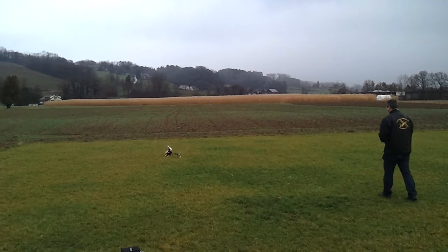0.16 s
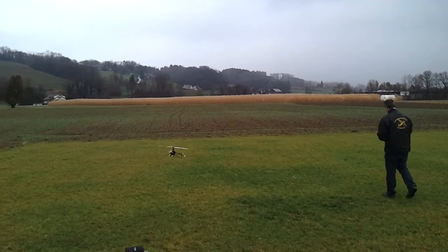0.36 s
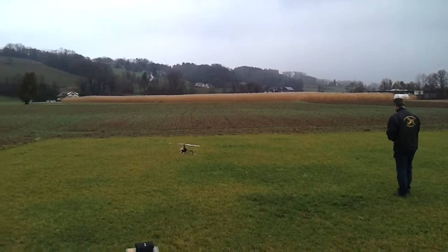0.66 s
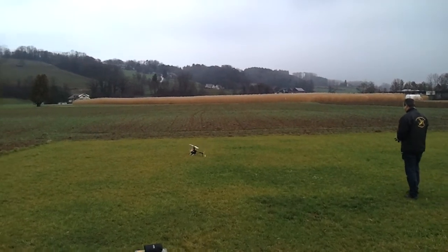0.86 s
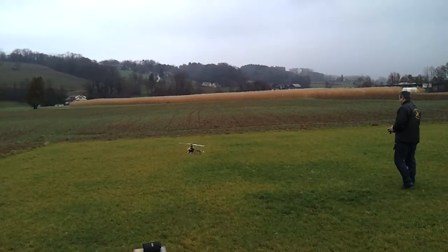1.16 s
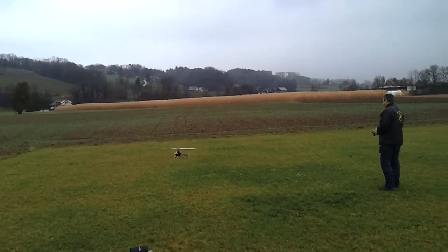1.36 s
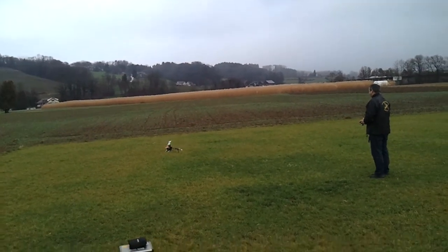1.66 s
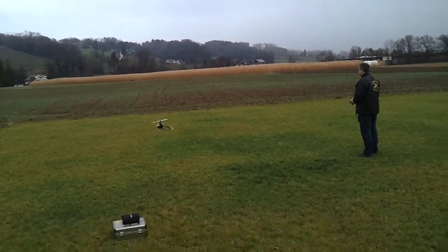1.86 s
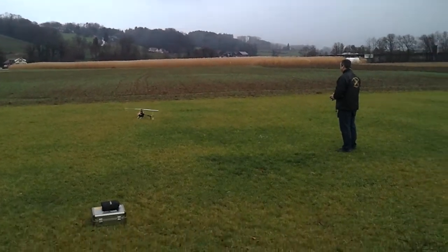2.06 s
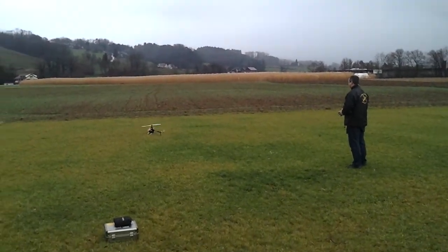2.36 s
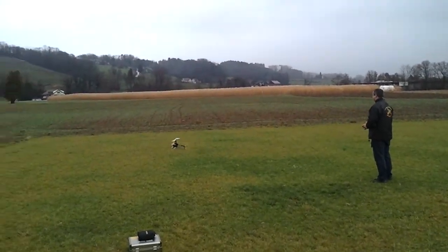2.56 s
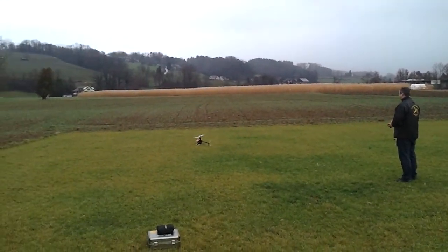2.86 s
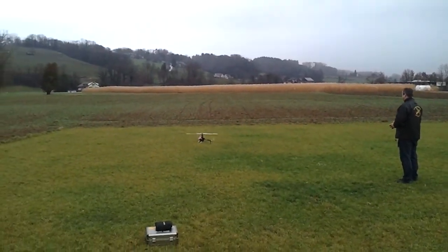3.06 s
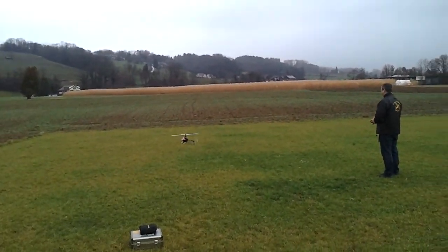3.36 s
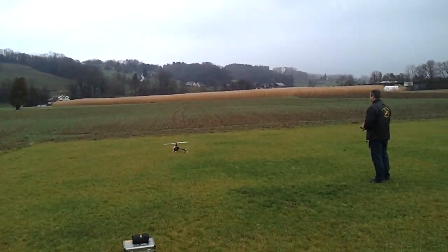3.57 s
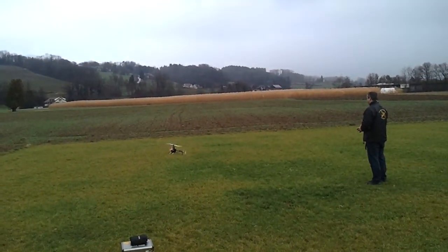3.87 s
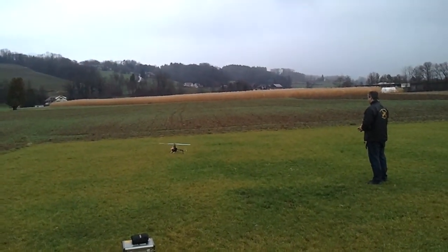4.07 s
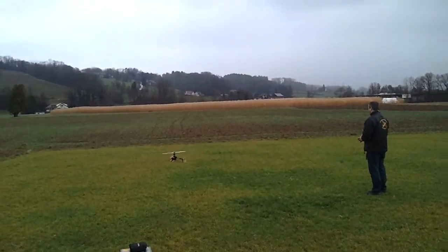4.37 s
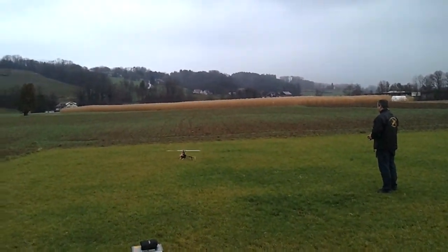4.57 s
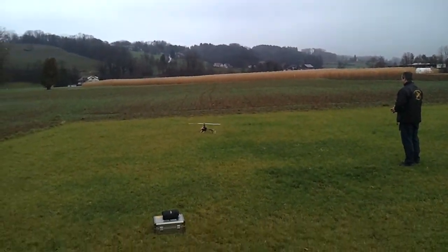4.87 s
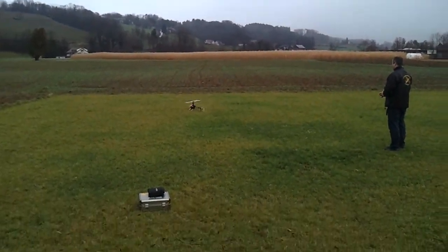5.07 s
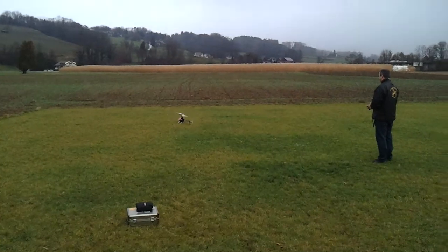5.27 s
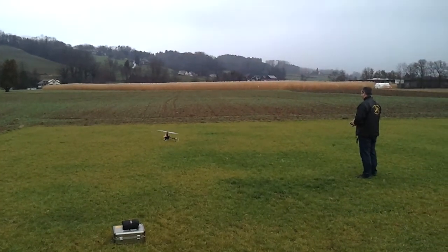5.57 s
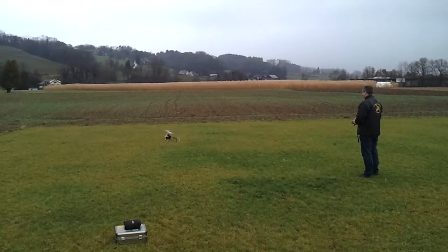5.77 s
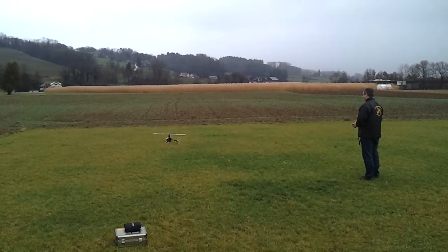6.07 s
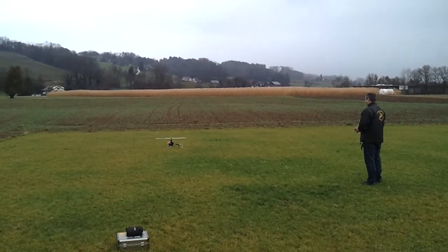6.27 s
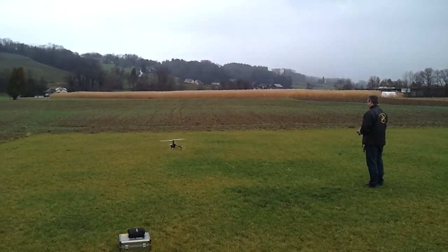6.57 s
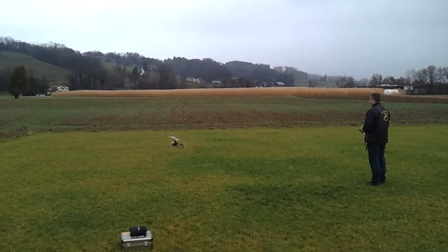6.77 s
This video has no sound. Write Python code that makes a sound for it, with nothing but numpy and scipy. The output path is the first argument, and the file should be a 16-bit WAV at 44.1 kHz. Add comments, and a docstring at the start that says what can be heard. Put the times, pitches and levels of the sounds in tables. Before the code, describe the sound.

Gear whine of an electric model helicopter rises throughout, beginning as a quiet, jerky rattling hum and ending high and shrill. Blade air grows brighter and a rough metallic rattle swells near four seconds. Low wind bumps hit the small microphone, strongest before two seconds. Open meadow, no echo, slightly dull treble, with soft distant hush behind.

```python
"""A meadow: an electric model helicopter spools up some metres from a small microphone.
The teeth of pinion and main gear whine ever higher, a stack of partials throbbing once per rotor turn and
flaring at the peaks of the gear housing. Shaft tones and noisy knocks ring the frame; the blades hiss as
shaped noise. Gusts of low noise and single eddies buffet the microphone above a distant outdoor hush."""
import sys
import numpy as np
from scipy import signal
from scipy.io import wavfile
from scipy.ndimage import uniform_filter1d

SR = 44100
rng = np.random.default_rng(int(sys.argv[2]) if len(sys.argv) > 2 else 0)


def waveform_to_disk(signal):
    """Save audio, clipped to [-1, 1], as 16-bit WAV at the path in sys.argv[1]."""
    frames = np.transpose(np.atleast_2d(signal))
    scaled = np.clip(frames, -1, 1) * 32767
    samples = np.round(scaled).astype(np.int16)
    wavfile.write(sys.argv[1], SR, samples)


N = 304731

# tooth contacts per turn of the main rotor, the tail shaft and the motor pinion
MAIN_TEETH, TAIL_RATIO, PINION_TEETH = 170, 43.4, 14.2


def gears(hz, phase, swell, lift_db):
    """Tooth whine: uneven teeth roughen the higher partials more, pinion run-out adds side tones to each."""
    # partials of the whine ahead of the housing: multiple of tooth rate, level_db at the reference speed,
    # growth_db per octave of speed, pull_db per kHz/s of acceleration, side_db of tones one pinion turn rate away
    partials = [(1, 1.16, 0.5, 1.5, -21.5), (2, -19, -5.5, 3.5, -14), (3, -29.5, 2, -2.5, -16.5),
                (4, -25.5, 12.5, -13.5, -8.5), (5, -30.5, 14.5, -2.3, -13), (6, -26.5, 27.5, -0.3, -8)]
    torque_lag_s = 0.12   # the motor's pull changes over this time
    pinion = np.exp(1j * (phase / PINION_TEETH + 0.9 * drift(30)))
    pull = uniform_filter1d(np.gradient(hz) * SR / 1000, int(torque_lag_s * SR))   # acceleration, kHz/s
    now_hz = np.gradient(phase) * SR / (2 * np.pi)   # tooth rate with its hurry and brake
    whine = 0
    for k, level_db, growth_db, pull_db, side_db in partials:
        k = round(k)
        skirt = from_db(-21) * k * (drift(200) + 1j * drift(200))   # roughness of uneven teeth
        flutter_db = 3.5 * drift(12) * (k > 3) + lift_db * (k > 2)
        above = housing((k + 1 / PINION_TEETH) * now_hz) * pinion
        below = housing((k - 1 / PINION_TEETH) * now_hz) / pinion
        strands = housing(k * now_hz) * (swell + skirt)
        strands = strands + from_db(side_db) * swell * (above + below)
        gain = np.sqrt(2) * from_db(per_octave(hz, level_db, growth_db) + pull_db * pull + flutter_db)
        whine = whine + gain * (strands * np.exp(1j * k * phase)).real
    return whine


def housing(hz):
    """Gain of the gear housing for a tone of slowly moving pitch; between peaks the motions add or cancel."""
    # pitches the housing radiates best: centre_hz, width_hz, level_db, sign of motion
    peaks = [(746, 256, -40.5, 1), (1033, 149, -43.5, -1), (1740, 420, -44, 1), (1910, 60, -48.5, 1),
             (2462, 60, -36, -1), (2898, 160, -36.5, 1), (3060, 440, -36, -1), (3514, 140, -32.5, 1),
             (3987, 140, -34, -1), (4120, 340, -41, 1), (4390, 413, -22.5, -1), (4756, 100, -17, 1),
             (4804, 183, -20.5, 1), (5123, 610, -29, 1), (5630, 380, -27.5, -1), (6114, 570, -7.5, -1),
             (6682, 310, -15.5, 1), (6876, 84, -10, -1), (7456, 1460, -17.5, 1)]
    coarse_hz = hz[::64]   # the pitch moves slowly enough for every 64th sample
    gain = 0
    for centre_hz, width_hz, level_db, sign in peaks:
        gain = gain + np.sign(sign) * from_db(level_db) / (1 + 2j * (coarse_hz - centre_hz) / width_hz) ** 2
    return np.interp(np.arange(N) / 64, np.arange(len(gain)), np.abs(gain))


def contacts(hz, throb, snatch):
    """Phase and swell of the tooth contacts: the eccentric main gear and the tail drive hurry and brake them."""
    teeth = 2 * np.pi * np.cumsum(hz) / SR
    rotor, tail = teeth / MAIN_TEETH + 0.2, teeth / TAIL_RATIO + 1.7   # radians
    loaded = np.clip((hz - 3000) / 900, 0, 1)   # the gear's run-out tells once the rotor pulls
    slack = np.clip((1150 - hz) / 300, 0, 1)    # backlash lets the tail drive jerk the slow gears
    wow = 1.15 * loaded * np.sin(rotor + 1.2) + 2.2 * slack * np.sin(tail - 1.6)
    swell = 1 + throb * np.cos(rotor) + 0.27 * throb * np.cos(2 * rotor + 0.3)
    swell = swell * (1 + 0.45 * snatch * np.cos(tail + 1.8))
    return teeth + wow, swell, rotor, tail


def shafts(phase, swell, rotor, tones_db):
    """Drive-locked tones waver, pulse with the rotor and flare where they cross a mode of the frame."""
    # beats of motor and tail shafts with the teeth: multiple of tooth rate, relative level_db
    shaft_tones = [(.0165, 4), (.046, 3), (.0625, 3), (.125, 6), (.205, -7), (.66, -12), (.69, -10),
                   (.86, -10), (.93, 4), (.96, -8), (1.07, -10), (1.14, -6), (1.24, -2), (1.5, 2),
                   (1.93, -2), (2.07, -4)]
    tones = 0
    for multiple, level_db in shaft_tones:
        waver = 1.3 * np.sqrt(multiple) * drift(39)   # radians
        tones = tones + from_db(level_db + 2.7 * drift(3.3)) * np.cos(multiple * phase + waver)
    pulse = 1 + 0.75 * np.cos(rotor + 3.78)
    return through_frame(from_db(tones_db + 5) * swell * pulse * tones, leak_db=-18.5)


def frame(tail, rotor, rattle_db, snatch):
    """Loose contacts ring the frame; knocks bunch with the tail-shaft turn and swell a little with the rotor."""
    bunch = np.exp(1.4 * np.cos(tail) + 1.1 * np.cos(2 * tail + 2.6) + 0.35 * drift(25))
    bunching = 1 - snatch + snatch * rms_one(bunch)
    knocks = rng.standard_normal(N) * bunching * (1 + 0.11 * np.cos(rotor + 0.5))
    knocks = butterworth(knocks, 1, 3000, "high")
    rung = through_frame(through_frame(knocks, leak_db=-14), leak_db=-12)
    return from_db(rattle_db + 7) * rms_one(rung)


def through_frame(x, leak_db):
    """The frame rings at its modes; some sound leaks past them."""
    # frame modes: centre_hz, width_hz, level_db
    modes = [(750, 80, -3), (1000, 100, -6), (3050, 160, -7), (3500, 110, -3), (4350, 150, -5),
             (4750, 170, -3), (5460, 200, -4), (6150, 200, 0), (6650, 220, -2), (7300, 250, -7)]
    ringing = sum(from_db(level_db) * resonance(x, hz, width_hz) for hz, width_hz, level_db in modes)
    return ringing + from_db(leak_db) * x


def blades(hz, rotor, hiss_db):
    """Air over the blades: shaped noise whose treble comes up only with tip speed."""
    # colour of the blade air: pitch_hz, relative level_db per Hz
    blade_colour = [(240, -37), (400, -7), (553, -3.5), (995, 1.5), (1250, -15), (1620, 1), (2800, -20.5),
                    (4030, 4.5), (4340, -6), (6000, 1.5), (7900, -25.5), (10300, -50), (17400, -120)]
    air = coloured(blade_colour, patchy_db=2.05)
    treble = butterworth(air, 2, 3500, "high")
    dull = butterworth(air, 2, 3500, "low")
    share = np.clip(hz / 3300, 0, 1) ** 1.5
    # the minus keeps the two halves from cancelling at the crossover
    return from_db(hiss_db) * (1 + 0.1 * np.cos(rotor + 0.5)) * (dull - share * treble)


def wind():
    """Lumpy low noise, and single eddies that shove the diaphragm for a few cycles."""
    # colour of the gusts: pitch_hz, relative level_db per Hz
    gust_colour = [(18, -44), (30, -6), (91, 1), (183, -0.5), (367, -10), (406, -15), (532, -18.5),
                   (900, -32), (1170, -69.5), (1980, -120)]
    # single eddies: start_s, level_db of the envelope's peak before flapping, pitch_hz
    buffets = [(0.208, -31, 164), (0.251, -29, 130), (1.297, -24.5, 164), (1.318, -24, 197),
               (1.348, -22, 118), (1.439, -24, 116), (1.493, -21.5, 167), (1.518, -22.5, 128),
               (1.658, -13, 295), (1.678, -13.5, 154), (1.75, -26, 186), (1.833, -28, 232),
               (1.925, -21, 149), (1.998, -22, 127), (2.037, -24, 85), (2.095, -30.5, 150),
               (3.111, -28.5, 147), (3.424, -22, 208), (3.447, -23.5, 114), (3.718, -21, 242),
               (3.735, -25, 93), (3.779, -22, 170), (3.859, -20.5, 188), (3.93, -26, 129),
               (4.644, -29.5, 103), (5.213, -22.5, 122), (5.987, -39, 148), (6.017, -25.5, 151),
               (6.218, -23.5, 220), (6.81, -28.5, 136.2)]
    lumps = gusting() * from_db(-6 + 3.6 * drift(26)) * coloured(gust_colour, patchy_db=0.5)
    for start_s, level_db, pitch_hz in buffets:
        cycles = np.arange(int(3.5 * SR / pitch_hz)) * pitch_hz / SR
        envelope = 1.8 * cycles * np.exp(1 - 1.8 * cycles)
        shove = from_db(level_db) * envelope * np.sin(2 * np.pi * cycles)
        # hard shoves flap and brighten
        shove *= 1 + min(3.5 * from_db(level_db), 1) * np.cos(2.6 * np.pi * cycles)
        at = round(start_s * SR)
        lumps[at:at + len(shove)] += rng.choice([-1, 1]) * shove[:N - at]
    return lumps


def gusting():
    """Relative strength of the wind: a calm, and gusts that swell and fall away."""
    # gusts on the microphone: centre_s, half_length_s, relative level_db
    gusts = [(0.34, 0.12, -42.5), (1.49, 0.19, -34), (1.655, 0.042, -23), (1.905, 0.18, -35),
             (3.082, 0.098, -47), (3.47, 0.19, -41.5), (3.749, 0.052, -28), (3.94, 0.15, -36),
             (6.018, 0.063, -31), (6.206, 0.09, -33), (6.75, 0.19, -42.5)]
    t = np.arange(N) / SR
    strength = from_db(-43.5)   # calm between gusts
    for centre_s, half_s, level_db in gusts:
        strength = strength + from_db(level_db) * np.exp(-((t - centre_s) / half_s) ** 4)
    return strength


def hush():
    """Distant outdoor hush: shaped noise with a mild flicker in each band."""
    # colour of the hush: pitch_hz, relative level_db per Hz
    hush_colour = [(18, -35), (30, -4.5), (76, 0.5), (298, -28.5), (535, -10.5), (738, -6.5), (833, -12.5),
                   (1170, -9.5), (2020, -7.5), (3700, -21), (4810, -54), (8140, -120)]
    return from_db(-42.5) * coloured(hush_colour, patchy_db=1.3)


def coloured(spectrum, patchy_db):
    """Third-octave bands of noise, each with its own level and flicker; rms 1."""
    edges = 30 * 2 ** np.arange(0, 8.2, 1 / 3)   # Hz
    white = rng.standard_normal((2, N))   # neighbouring bands take different noise
    hz, db = np.transpose(spectrum)
    out = 0
    for k, (low, high) in enumerate(zip(edges, edges[1:])):
        level_db = np.interp(np.log(low * high) / 2, np.log(hz), db)
        if level_db > -55:   # fainter bands are left out
            band = butterworth(white[k % 2], 2, [low, high], "band")
            out = out + band * from_db(level_db + patchy_db * drift(1.9))
    return rms_one(out)


def from_db(db):
    """Gain of a level."""
    return 10 ** (np.asarray(db) / 20)


def per_octave(hz, db, growth_db):
    """A level given at a tooth rate of 2000 Hz that changes with each octave of drive speed."""
    return db + growth_db * np.log2(hz / 2000)


def rms_one(x):
    """Scaled to rms 1."""
    return x / np.sqrt(np.mean(x ** 2) + 1e-20)


def in_time(rows):
    """Columns of a curve, one value per sample."""
    s, *columns = np.transpose(rows)
    return [np.interp(np.arange(N) / SR, s, c) for c in columns]


def drift(rate_hz):
    """Slow chance of rms 1: noise through two equal one-pole lowpasses, after a second to settle."""
    r = np.exp(-2 * np.pi * rate_hz / SR)
    return rms_one(signal.lfilter([1], [1, -2 * r, r * r], rng.standard_normal(N + SR))[SR:])


def resonance(x, hz, width_hz):
    """Two-pole peak of gain about 1."""
    r = np.exp(-np.pi * width_hz / SR)
    poles = [1, -2 * r * np.cos(2 * np.pi * hz / SR), r * r]
    return signal.lfilter([(1 - r * r) / 2, 0, (r * r - 1) / 2], poles, x)


def butterworth(x, order, hz, kind):
    """Butterworth filter with no ripple in its passband."""
    return signal.sosfilt(signal.butter(order, hz, kind, fs=SR, output="sos"), x)


def steep_low(x, hz):
    """Elliptic lowpass: a sharp edge down to a floor of -50 dB."""
    return signal.sosfilt(signal.ellip(8, 0.5, 50, hz, fs=SR, output="sos"), x)


def scene():
    """Helicopter, wind and hush at one microphone."""
    # drive speed: time_s, tooth_rate_hz
    spool_up = [(0.0, 599), (0.12, 641), (0.38, 679), (0.62, 781), (1.0, 1012), (1.5, 1199), (2.08, 1384),
                (2.17, 1496), (2.34, 1781), (2.42, 1885), (2.85, 2198), (3.02, 2405), (3.27, 2899),
                (3.61, 3341), (4.04, 3675), (4.52, 3893), (5.48, 4177), (5.96, 4350), (6.25, 4501),
                (6.91, 5005)]
    # frame and shafts: time_s, rattle_db and tones_db ahead of fixed boosts, rotor throb 0-1,
    # lift_db of the whine partials above the second
    load = [(0, -58.5, -57.5, 0.07, -10), (.9, -50, -46, 0.3, 12), (1.5, -50, -57, 0.04, 5),
            (1.9, -54, -50, 0.14, 4.5), (2.08, -61, -57, 0, 4), (2.35, -50.5, -65, 0.2, 11.5),
            (2.6, -56, -59, 0, -2.5), (2.85, -55, -68, 0.12, 15.5), (3.7, -45, -55, 0.35, -5),
            (3.82, -39, -45, 0.54, 2), (4.0, -44.5, -50, 0.64, .1), (4.25, -52, -54, 0.22, .1),
            (4.6, -47, -49.5, 0.12, 6), (4.9, -58, -45.5, .2, 2), (5.1, -52, -49, 0.59, 1),
            (5.6, -46.5, -42.5, 0.51, 2), (6.3, -57.5, -45.5, 0.25, -6.3), (6.91, -57, -44, 0, 1)]
    hz, = in_time(spool_up)
    rattle_db, tones_db, throb, lift_db = in_time(load)
    taut = np.clip((hz - 1450) / 150, 0, 1)   # the drive pulls taut from 1450 to 1600 Hz tooth rate
    snatch = 0.55 - 0.15 * taut   # tail-shaft snatch, 0-1
    phase, swell, rotor, tail = contacts(hz, np.clip(throb, 0, 1), snatch)
    craft = gears(hz, phase, swell, lift_db)
    craft = craft + shafts(phase, swell, rotor, tones_db)
    craft = craft + frame(tail, rotor, rattle_db, snatch)
    craft = craft + blades(hz, rotor, per_octave(hz, -45, 7))
    return (craft + wind() + hush())[None]


def record(dry):
    """Sampled slowly, then smoothed steeply: the top of the band returns as a faint mirror above half the rate."""
    sampling_hz, cutoff_hz = 16000, 8900
    dry = butterworth(dry, 2, 50, "high")   # small microphone
    dry = butterworth(dry, 4, 7000, "low")
    band = steep_low(dry, 7950)
    mirror = 2 * band * np.cos(2 * np.pi * sampling_hz * np.arange(N) / SR)
    smooth = butterworth(band + mirror, 18, 7900, "low")
    return steep_low(smooth, cutoff_hz)


dry = scene()
out = record(dry)
waveform_to_disk(out)
```